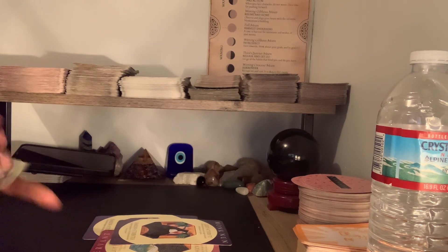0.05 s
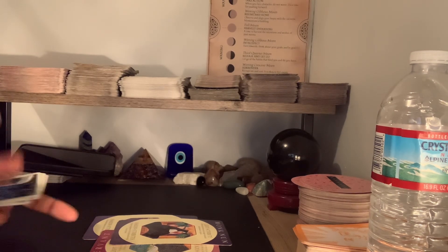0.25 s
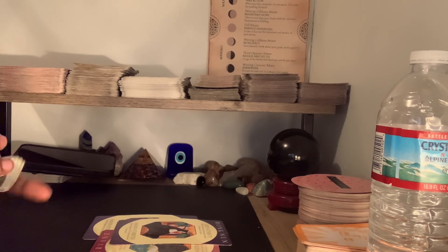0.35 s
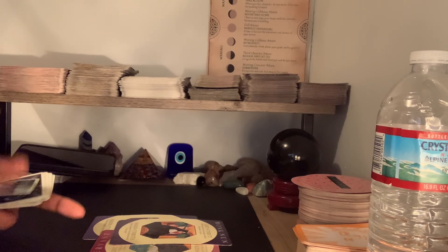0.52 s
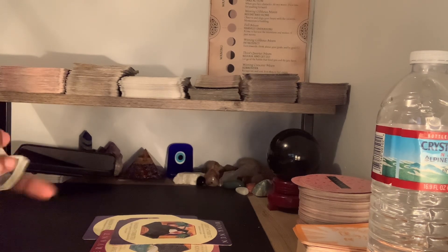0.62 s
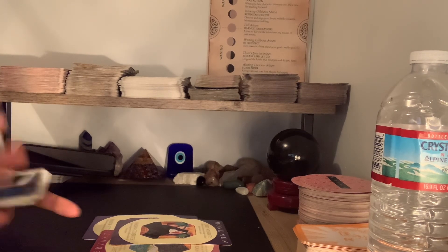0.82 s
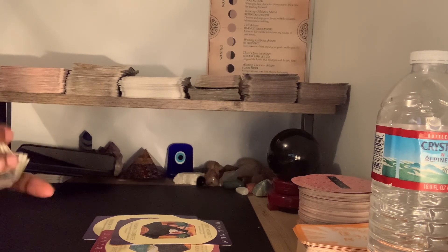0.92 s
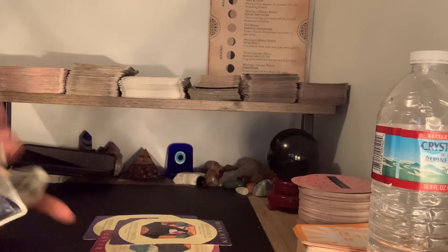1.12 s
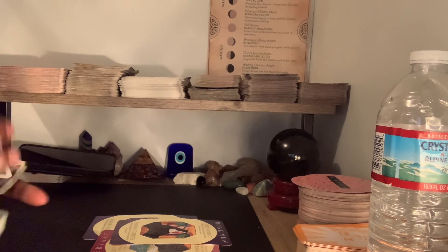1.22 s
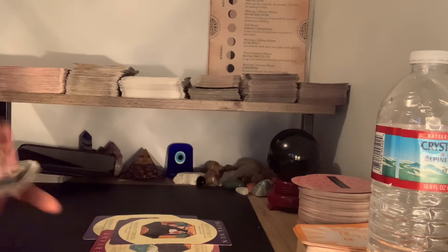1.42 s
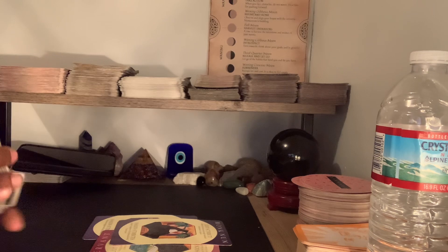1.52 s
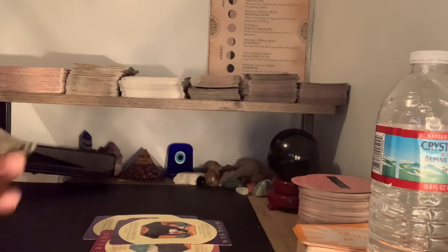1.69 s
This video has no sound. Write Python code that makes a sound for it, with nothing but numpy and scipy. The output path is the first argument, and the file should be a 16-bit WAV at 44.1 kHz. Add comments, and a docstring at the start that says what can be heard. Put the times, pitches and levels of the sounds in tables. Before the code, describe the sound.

A deck of cards is shuffled overhand, quick clicking slaps and short hisses in a small room

```python
"""In a small room, over a desk, a deck of cards is shuffled overhand, close by and a little to the left.
Eleven times a packet brushes the deck, its edges click, and it claps home on the palm with a soft thump.
Claps, clicks and brushes are shaped noise, the thump adds a damped low mode, and trapped air colours the claps.
Before every second landing the cards slide with a swelling hiss; at the end the deck is settled.
Decaying noise tails give the reflections of desk and room, over a quiet floor and a rumble of the hands."""
import sys
import numpy as np
from scipy import signal
from scipy.fft import rfft, irfft, next_fast_len
from scipy.io import wavfile

SR = 44100
rng = np.random.default_rng(int(sys.argv[2]) if len(sys.argv) > 2 else 0)


def output_pcm(signal):
    """Save a mono or channel-first signal as 16-bit PCM at the path in sys.argv[1].

    Samples are clipped to [-1, 1] before scaling.
    """
    pcm = np.clip(np.atleast_2d(signal).T, -1, 1) * 32767
    wavfile.write(sys.argv[1], SR, np.round(pcm).astype(np.int16))


N = 77175

# Steady noise of the quiet room: (frequency [Hz], density [dB per Hz])
FLOOR_SPECTRUM = [(20, -26), (52, -14.5), (100, -14.5), (150, -17), (300, -17.5), (900, -29.5),
                  (2000, -10.5), (4000, -30), (8000, -24), (16000, -29)]
FLOOR_DB = -70
# Rumble of the moving hands: (time [s], level [dB])
HANDLING_LEVEL = [(0, -52.5), (.3, -72), (.7, -67), (1.1, -53.5), (1.45, -65.5), (1.6, -67), (1.75, -70)]
# Colour of that rumble: (frequency [Hz], density [dB per Hz])
HANDLING_SPECTRUM = [(20, -23), (50, 0), (100, -10), (200, -12.5), (400, -17.5), (1200, -14.5),
                     (4000, -22.5), (16000, -38)]

# Edges brushing the deck: (start [s], length [s], level [dB])
BRUSHES = [(0.051, 0.024, -39.5), (0.195, 0.0067, -30.5), (0.32, 0.018, -30.5), (.470, 0.0057, -24.5),
           (0.595, 0.039, -35), (0.746, 0.021, -33.5), (0.865, 0.035, -33), (1.038, 0.035, -35),
           (1.134, 0.046, -33), (1.2889, .028, -30.5), (1.426, 0.017, -30), (1.516, 0.016, -50.5),
           (1.619, 0.028, -55), (1.651, 0.047, -59)]
# Colour of brushing edges: (frequency [Hz], density [dB per Hz])
BRUSH_SPECTRUM = [(60, -13.5), (250, -16), (420, -1.5), (700, 1), (1500, 0), (2400, -7), (3900, 1.5),
                  (4900, -7), (8000, -11), (11000, -6), (12700, -10.5), (14500, -5.5)]
# Cards sliding face on face: (start [s], end [s], final level [dB])
SLIDES = [(0.116, 0.205, -38), (0.368, 0.471, -39.5), (0.664, 0.772, -37), (0.956, 1.037, -38),
          (1.215, 1.308, -36)]
# Colour of sliding faces: (frequency [Hz], density [dB per Hz])
SLIDE_SPECTRUM = [(100, -17), (400, -6), (700, 2), (1200, -1.5), (2500, 0.5), (3800, 5.5), (4900, -2),
                  (7500, -0.5), (10500, 1), (12700, -10), (14500, 0)]
SLIDE_RISE_DB = 16.5
BRUSH_ROUGH_DB, SLIDE_ROUGH_DB = 6, 5  # grain depth
GRAINS_PER_S = 900
RUB_ATTACK_S, RUB_RELEASE_S = 0.0012, 0.0016  # time constants

# Card edges clicking: (time [s], level [dB], 60 dB decay time [s], sheen of the top octave [dB])
CLICKS = [(0.052, -37.5, 0.022, -8), (.065, -31, 0.018, 7), (.097, -32.5, 0.032, 4),
          (0.1583, -41.5, 0.0057, -7), (0.2035, -16.5, 0.0086, -24), (0.2203, -21, 0.03, 17),
          (0.222, -7.5, 0.011, 9), (0.227, -10.5, 0.01, 2), (0.3243, -30, 0.014, 3),
          (0.3342, -10, 0.0087, 17), (0.3427, -19.5, .012, -26), (.4745, -20, 0.01, -33),
          (.493, -26, 0.013, -8), (.496, -15, 0.016, -0.5), (0.596, -26.5, 0.011, -11),
          (0.609, -25, 0.012, 5), (0.6123, -12, 0.017, -0.5), (.6195, -20, 0.01, -0.5),
          (0.76, -21.5, 0.0025, -26), (0.7779, -10, 0.015, 3.5), (0.78, -19.5, 0.012, 7),
          (0.8657, -30, 0.014, -0.5), (0.8785, -7.5, 0.0047, -9), (0.8838, -18.5, 0.012, 2.5),
          (0.891, -15, 0.0061, -6.5), (.936, -34.5, .02, 6), (1.024, -32, .022, -3),
          (1.0436, -14, 0.036, 7), (1.0482, -21, .018, 0.5), (1.133, -32, 0.011, 5),
          (1.1377, -14.5, 0.0059, -1.5), (1.156, -7, 0.008, 7), (1.167, -18.5, 0.042, 1),
          (1.3, -15.5, 0.011, -27.5), (1.312, -14.5, 0.015, -6), (1.406, -50, .007, 1),
          (1.4427, -11, 0.0062, 3), (1.449, -24.5, 0.036, 0), (1.518, -36, 0.013, -23),
          (1.5294, -52, 0.011, -3)]
# Colour of a click before its sheen: (frequency [Hz], density [dB per Hz])
EDGE_SPECTRUM = [(200, -9), (800, -5), (2000, 5), (3000, -0.5), (3900, 11.5), (4900, -6), (7000, 3),
                 (10000, 1.5), (12500, 0), (14800, 1)]
# Weight of the sheen over the treble: (frequency [Hz], share of the sheen [1])
SHEEN_SHARE = [(8000, 0.069), (13500, 0.93)]
CLICK_ATTACK_S = .00009

# Lighter pats of cards on the hand: (time [s], level [dB], resonance [Hz])
PATS = [(.053, -33, 800), (0.063, -32.5, 600), (0.08, -27.5, 1360), (0.098, -30.5, 1620),
        (0.203, -24.5, 1010), (0.327, -24.5, 700), (.472, -34, 1000), (.495, -23, 720), (0.512, -48, 1000),
        (.604, -26, 800), (.620, -24, 1500), (0.759, -28, 1100), (0.798, -54, 1200), (.892, -30, 1100),
        (1.005, -41.5, 600), (1.059, -30.5, 650), (1.068, -25, 900), (1.139, -28, 1000),
        (1.1586, -14.5, 1120), (1.173, -20.5, 1400), (1.298, -26, 1100), (1.448, -25.5, 1600),
        (1.633, -50.5, 700)]
PAT_T60_S, PAT_OCTAVES = 0.038, 0.37  # decay; half width of the resonance
# Fingers bumping the deck softly: (time [s], level [dB])
BUMPS = [(.055, -43), (.105, -43), (0.198, -45.5), (0.641, -44.5), (0.888, -37), (.943, -46),
         (1.085, -45.5), (1.11, -46.5), (1.158, -33), (1.194, -42), (1.288, -48), (1.519, -48.5),
         (1.559, -59)]
# Colour of a bump: (frequency [Hz], density [dB per Hz])
BUMP_SPECTRUM = [(40, -21), (90, -9.5), (145, 0), (240, 2.5), (400, -16), (1000, -43.5), (4000, -76)]
BUMP_ATTACK_S, BUMP_T60_S = 0.0023, 0.092

# Packets landing: (time [s], slap level [dB], resonance of the air pocket [Hz], its level [dB],
# thump level [dB], extra to the left [dB])
LANDINGS = [(0.071, -35.5, 1430, -32, -47.5, -7), (.220, -24.5, 1290, -27, -37.5, -1),
            (.3275, -33, 1005, -25.5, -41.5, 3), (0.4947, -25, 1050, -21, -40, -3.5),
            (.611, -29, 940, -30, -47.5, -6), (.777, -25, 1190, -18, -40, -4.5),
            (0.876, -31.5, 1340, -28, -50, -3.5), (1.044, -31, 860, -32, -46.5, -3),
            (1.162, -17.5, 1917, -9.5, -43.5, 0), (1.312, -27.5, 1440, -25, -43, -4),
            (1.437, -27.5, 892, -23.5, -43.5, -1.5)]
# Colour of a slap: (frequency [Hz], density [dB per Hz])
SLAP_SPECTRUM = [(60, -27.5), (200, -15), (400, -16.5), (660, -2), (1200, 3), (1700, -14), (2500, 1),
                 (4000, -16), (7000, -24), (16000, -39.5)]
SLAP_ATTACK_S, SLAP_T60_S = 0.00032, 0.047
POCKET_T60_S, POCKET_OCTAVES = 0.034, .17  # decay; half width of the resonance
SKIRT_DB = 17  # steepness of the skirts of a resonance
THUMP_HZ, THUMP_ATTACK_S, THUMP_T60_S = 84, 0.00376, 0.053
# Dull rumble of the hands under each thump: (frequency [Hz], density [dB per Hz])
FLESH_SPECTRUM = [(30, -6.5), (60, -9.5), (150, -0.5), (250, 2.5), (400, -7), (600, -32), (2000, -55)]
FLESH_DB, FLESH_T60_S = 3, 0.085  # level relative to the thump; decay

# Correlation of left and right noise: (frequency [Hz], likeness [1])
LIKENESS = [(60, 0.92), (150, 0.94), (300, 0.99), (600, 0.23), (1100, 0.81), (2000, 0.45), (4000, 0.27),
            (8000, 0.18), (14000, 0.82)]
# Excess of the left channel: (frequency [Hz], level difference [dB])
LEFT_EXCESS = [(60, 1.5), (250, 0.5), (550, 11), (1000, 8), (2000, 2.5), (4000, 5.5), (8000, 2.8),
               (13000, 0)]
LEFT_LEAD_S = .00004
# Reverberation of the room: (frequency [Hz], 60 dB decay time [s])
ROOM_T60 = [(100, 0.25), (500, 0.21), (1000, 0.18), (2000, 0.19), (4000, 0.19), (9000, 0.16), (16000, 0.15)]
# Colour of all reflections: (frequency [Hz], density [dB per Hz])
ROOM_TONE = [(100, 1), (500, -1.5), (1500, 0), (4000, -1.5), (9500, -2), (12700, -13), (15000, -0.5)]
DESK_DB, DESK_T60_S, DESK_DELAY_S = -3.5, 0.033, 0.001163
ROOM_DB, ROOM_DELAY_S = -8.5, .006
LOW_CUT_HZ, TOP_HZ, CEILING = 44, 16150, .95


def amp(db):
    """Level: decibels to an amplitude ratio."""
    return 10 ** (np.asarray(db) / 20)


def along(points, hz):
    """Logarithmic pitch scale: interpolate (frequency [Hz], value) points."""
    f, value = np.transpose(points)
    return np.interp(np.log(hz + 1), np.log(f + 1), value)


def filtered(x, response):
    """Linear filtering: multiply the spectrum of x by a response of frequency."""
    size = next_fast_len(N + 8192)
    spectrum = rfft(x, size) * response(np.fft.rfftfreq(size, 1 / SR))
    return irfft(spectrum, size)[..., :N]


def noise(spectrum, size):
    """Partial coherence: mid and side noise mixed to a set correlation, coloured, of rms 1."""
    hz = np.fft.rfftfreq(size, 1 / SR)
    angle = np.arccos(np.clip(along(LIKENESS, hz), -1, 1)) / 2
    white = rfft(rng.standard_normal((2, size)))
    coloured = white * amp(along(spectrum, hz))
    mid, side = irfft(coloured * [np.cos(angle), np.sin(angle)], size)
    pair = np.array([mid + side, mid - side])
    return pair / pair.std()


def clock():
    """Event time: seconds since an onset, for a third of a second."""
    return np.arange(SR // 3) / SR


def strike(attack, t60):
    """Impact: a quick exponential rise, then exponential decay."""
    return (1 - np.exp(-clock() / attack)) * amp(-60 * clock() / t60)


def burst(spectrum, attack, t60):
    """Broadband impact: coloured noise under a blow's envelope, with the energy of that envelope."""
    envelope = strike(attack, t60)
    x = envelope * noise(spectrum, len(envelope))
    return x * np.sqrt(np.mean(envelope ** 2) / np.mean(x ** 2))


def ring(hz, attack, t60):
    """Modal vibration: one damped sinusoidal mode."""
    return np.sqrt(2) * np.sin(2 * np.pi * hz * clock()) * strike(attack, t60)


def rub(spectrum, length, rough_db):
    """Dry friction: noise whose level wanders at random from grain to grain while contact lasts."""
    t = clock()
    grain_db = rough_db * np.interp(t * GRAINS_PER_S, np.arange(len(t)), rng.standard_normal(len(t)))
    grain = amp(grain_db)
    grain /= np.sqrt(np.mean(grain ** 2))
    onset = 1 - np.exp(-t / RUB_ATTACK_S)
    release = np.exp(-np.maximum(t - length, 0) / RUB_RELEASE_S)
    return onset * release * grain * noise(spectrum, len(t))


def hollow(hz, octaves):
    """Cavity resonance: the broad spectral peak of a leaky pocket of air between cards."""
    f = np.geomspace(20, SR / 2, num=200)
    detuning = np.log2(f / hz) / octaves
    return np.transpose([f, -SKIRT_DB * np.log10(1 + detuning ** 2)])


def add(track, s, sound):
    """Superposition: mix a sound in at s seconds."""
    part = track[:, max(round(s * SR), 0):][:, :sound.shape[-1]]
    part += sound[..., :part.shape[1]]


def background():
    """Stationary and modulated noise: the quiet room, and a rumble that follows the moving hands."""
    level_db = np.interp(np.arange(N) / SR, *np.transpose(HANDLING_LEVEL))
    room = amp(FLOOR_DB) * noise(FLOOR_SPECTRUM, N)
    return room + amp(level_db) * noise(HANDLING_SPECTRUM, N)


def brushes():
    """Rough friction: card edges brush the deck in short grainy strokes."""
    out = np.zeros((2, N))
    for s, length, db in BRUSHES:
        add(out, s, amp(db) * rub(BRUSH_SPECTRUM, length, BRUSH_ROUGH_DB))
    return out


def clicks():
    """Short impact, wide spectrum: single card edges click brightly."""
    out = np.zeros((2, N))
    for s, db, t60, sheen_db in CLICKS:
        colour = [(hz, level + sheen_db * along(SHEEN_SHARE, hz)) for hz, level in EDGE_SPECTRUM]
        add(out, s, amp(db) * burst(colour, CLICK_ATTACK_S, t60))
    return out


def pats():
    """Damped cavity resonance: cards pat the hand lightly and excite a broad air resonance."""
    out = np.zeros((2, N))
    for s, db, hz in PATS:
        add(out, s, amp(db) * burst(hollow(hz, PAT_OCTAVES), SLAP_ATTACK_S, PAT_T60_S))
    return out


def bumps():
    """Soft impact, slow attack: fingers bump the deck with little treble."""
    out = np.zeros((2, N))
    for s, db in BUMPS:
        add(out, s, amp(db) * burst(BUMP_SPECTRUM, BUMP_ATTACK_S, BUMP_T60_S))
    return out


def landings():
    """Impact with resonance: a packet slaps, excites its trapped air and thumps the hand."""
    out = np.zeros((2, N))
    for s, slap_db, hz, pocket_db, thump_db, left_db in LANDINGS:
        slap = amp(slap_db) * burst(SLAP_SPECTRUM, SLAP_ATTACK_S, SLAP_T60_S)
        pocket = amp(pocket_db) * burst(hollow(hz, POCKET_OCTAVES), SLAP_ATTACK_S, POCKET_T60_S)
        add(out, s, (slap + pocket) * amp([[left_db / 2], [-left_db / 2]]))
        mode = ring(THUMP_HZ, THUMP_ATTACK_S, THUMP_T60_S)
        flesh = amp(FLESH_DB) * burst(FLESH_SPECTRUM, BUMP_ATTACK_S, FLESH_T60_S)
        add(out, s, amp(thump_db) * (mode + flesh))
    return out


def slides():
    """Sliding friction: faces hiss louder as the packet speeds up, levelling off towards the end."""
    out = np.zeros((2, N))
    for s, end, db in SLIDES:
        length = end - s
        swell_db = -SLIDE_RISE_DB * np.minimum(clock() / length - 1, 0) ** 2
        add(out, s, amp(db + swell_db) * rub(SLIDE_SPECTRUM, length, SLIDE_ROUGH_DB))
    return out


def echo(x, t60s, delay):
    """Diffuse reverberation: convolve with delayed noise that decays at its own rate in each band."""
    hz, t, bands = signal.stft(noise(ROOM_TONE, SR // 2), SR, nperseg=256)
    decay = amp(-60 * t / along(t60s, hz)[:, None])
    tail = signal.istft(bands * decay, SR, nperseg=256)[1]
    tail = tail / np.linalg.norm(tail[0])
    tail = np.pad(tail, ((0, 0), (round(delay * SR), 0)))
    return signal.fftconvolve(x, tail, axes=1)[:, :N]


def reflected(x):
    """Direct and reflected sound: add the short tail of the desk and the longer one of the room."""
    desk = amp(DESK_DB) * echo(x, [(1000, DESK_T60_S)], DESK_DELAY_S)
    room = amp(ROOM_DB) * echo(x, ROOM_T60, ROOM_DELAY_S)
    return x + desk + room


def to_the_left(x):
    """Interchannel level and time difference: the left channel is stronger and leads."""
    sides = np.array([[.5], [-.5]])

    def response(hz):
        """Half of each difference for either channel, with opposite signs."""
        return amp(sides * along(LEFT_EXCESS, hz)) * np.exp(2j * np.pi * hz * sides * LEFT_LEAD_S)

    return filtered(x, response)


def scene():
    """Superposition: the cards with their reflections, set to the left, over the background."""
    quiet = background()
    friction = brushes() + slides()
    blows = pats() + bumps() + landings()
    cards = sum(reflected(x) for x in (friction, clicks(), blows))
    return to_the_left(cards) + quiet


def record(dry):
    """Band limiting and soft saturation: cut deepest bass, round the highest peaks, cut the top."""
    thin = signal.sosfilt(signal.butter(4, LOW_CUT_HZ, "high", fs=SR, output="sos"), dry)
    rounded = thin / (1 + (thin / CEILING) ** 6) ** (1 / 6)
    return filtered(rounded, lambda hz: 1 / np.sqrt(1 + (hz / TOP_HZ) ** 180))


dry = scene()
out = record(dry)
output_pcm(out)
```